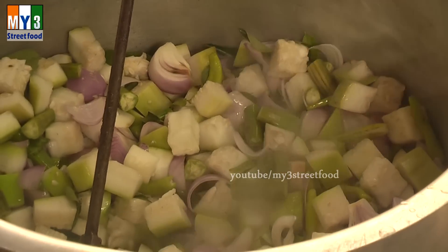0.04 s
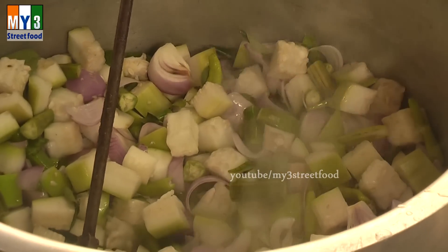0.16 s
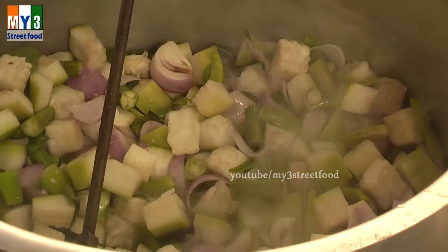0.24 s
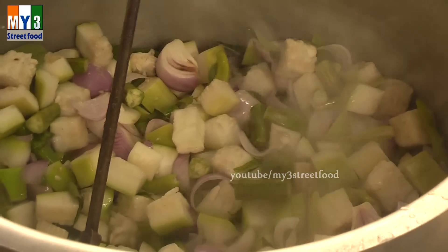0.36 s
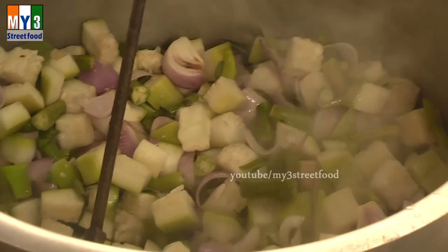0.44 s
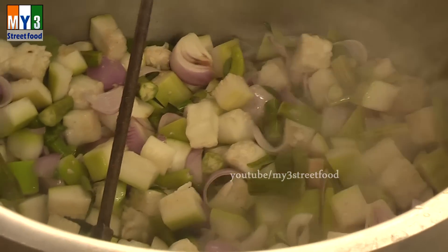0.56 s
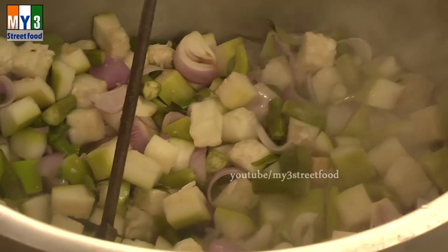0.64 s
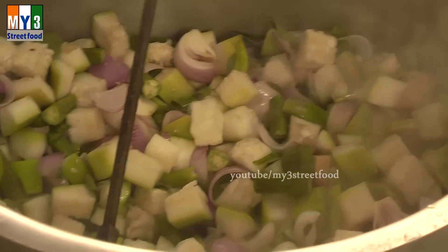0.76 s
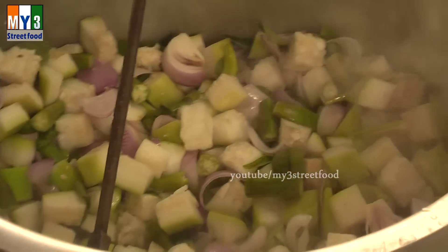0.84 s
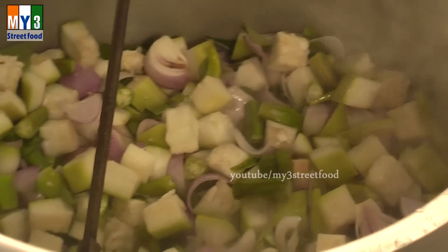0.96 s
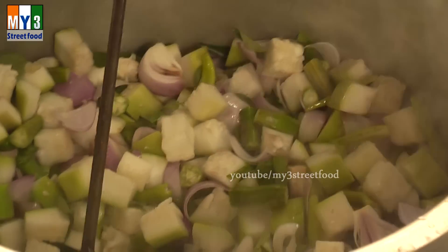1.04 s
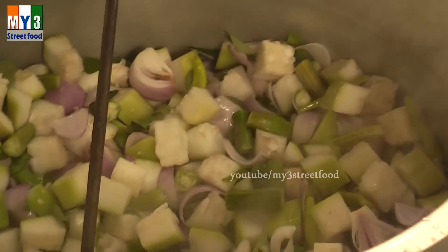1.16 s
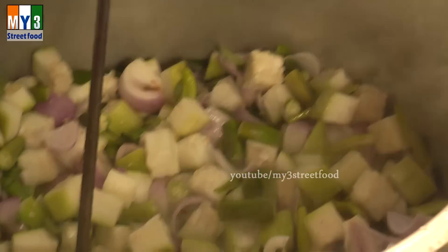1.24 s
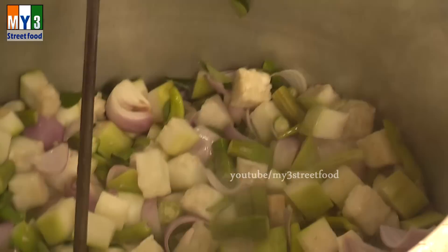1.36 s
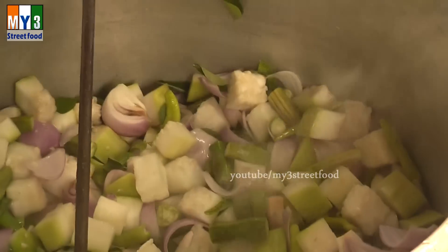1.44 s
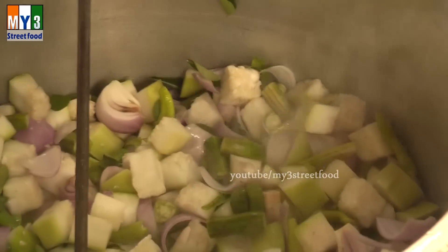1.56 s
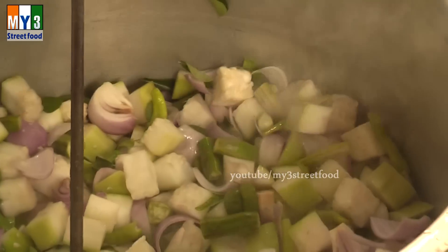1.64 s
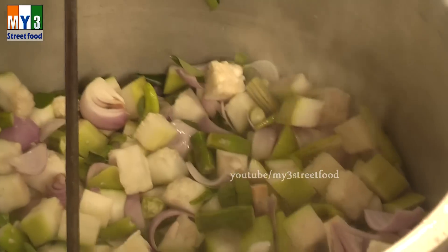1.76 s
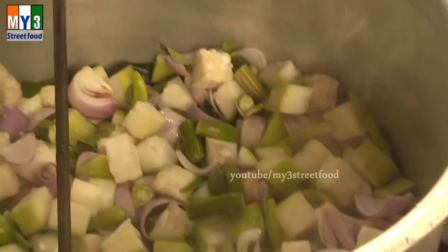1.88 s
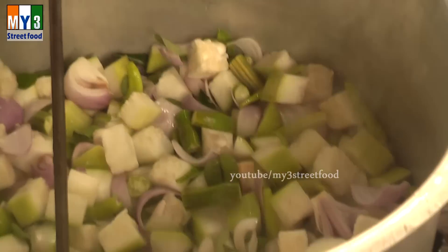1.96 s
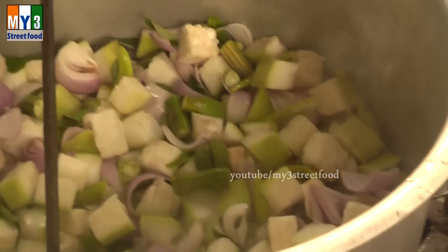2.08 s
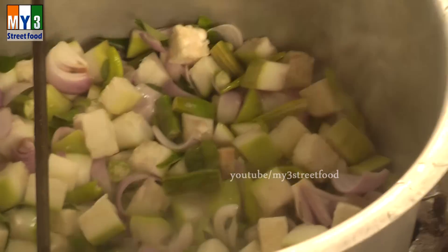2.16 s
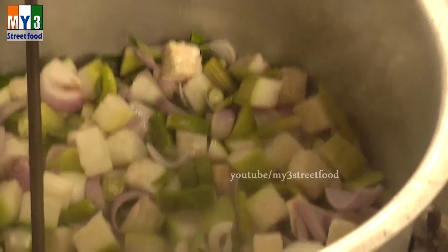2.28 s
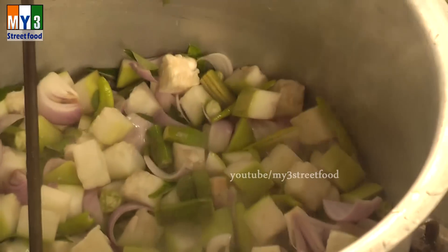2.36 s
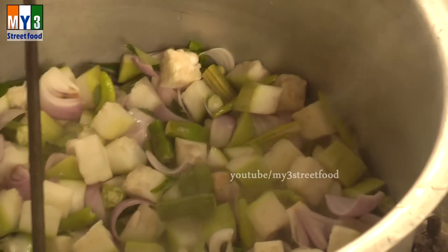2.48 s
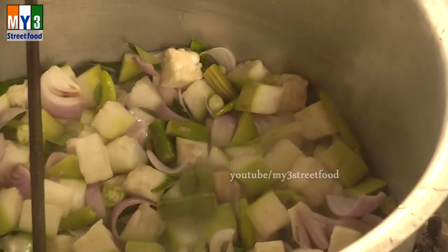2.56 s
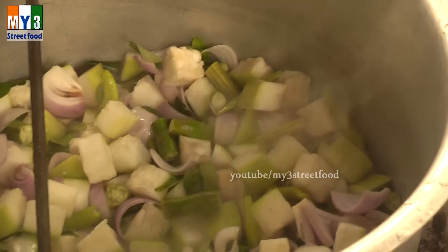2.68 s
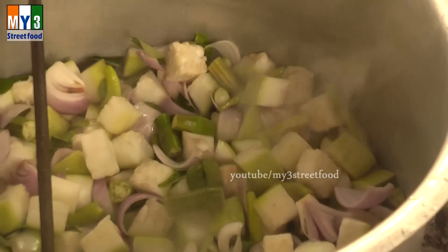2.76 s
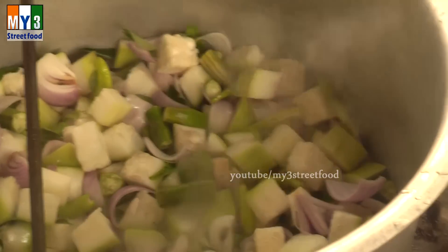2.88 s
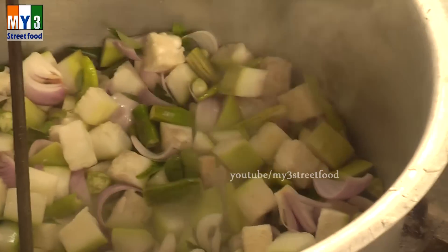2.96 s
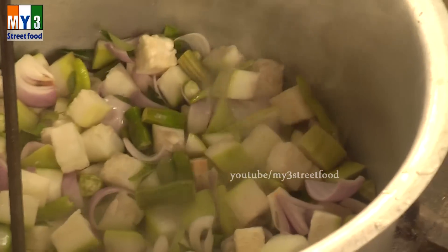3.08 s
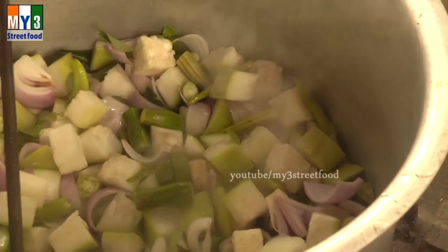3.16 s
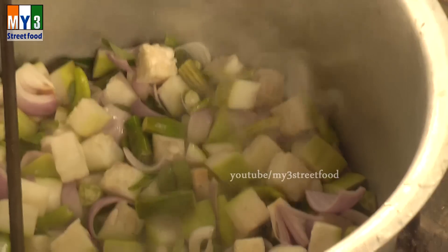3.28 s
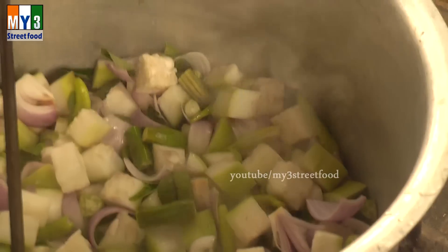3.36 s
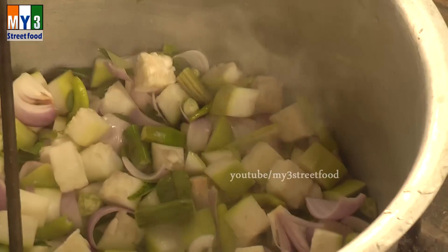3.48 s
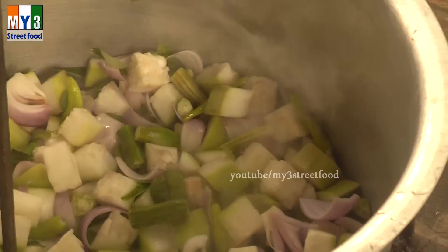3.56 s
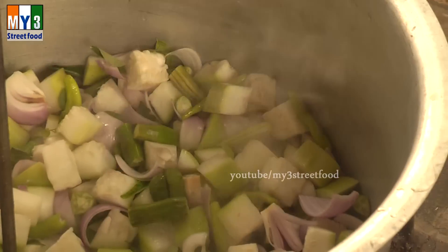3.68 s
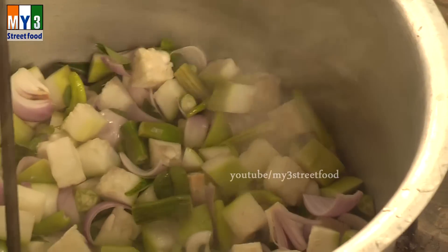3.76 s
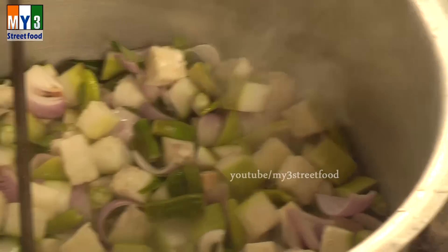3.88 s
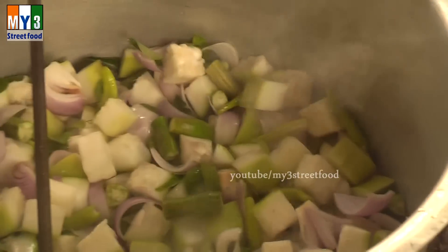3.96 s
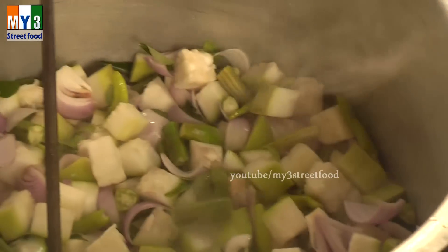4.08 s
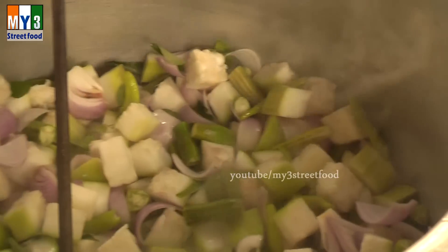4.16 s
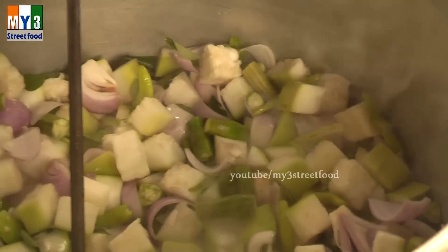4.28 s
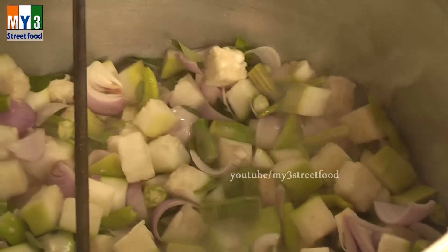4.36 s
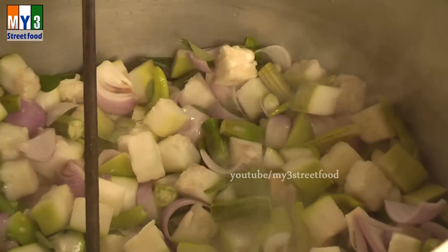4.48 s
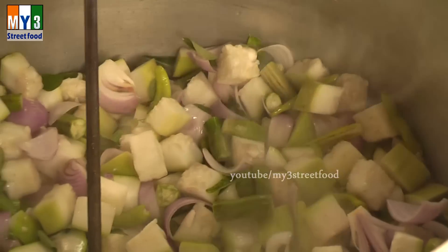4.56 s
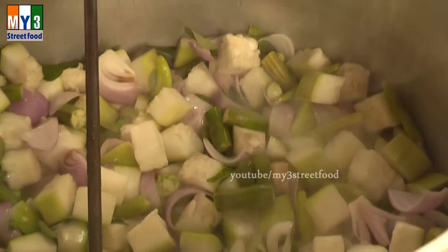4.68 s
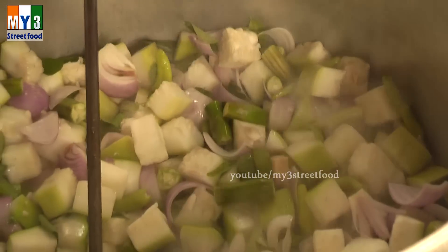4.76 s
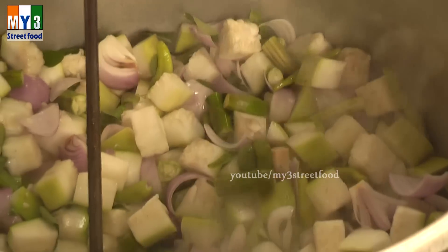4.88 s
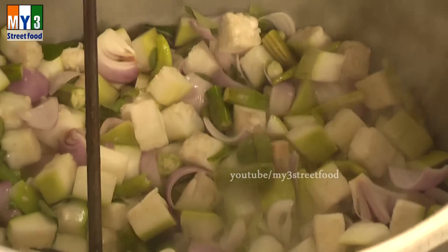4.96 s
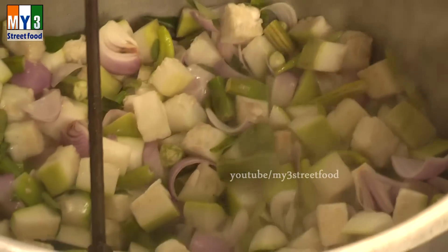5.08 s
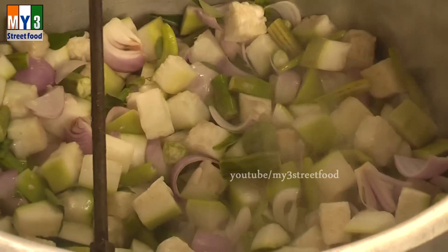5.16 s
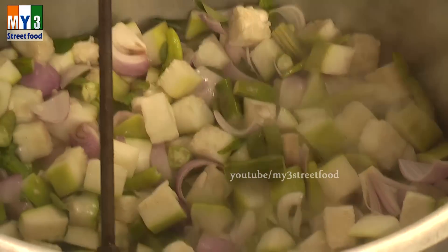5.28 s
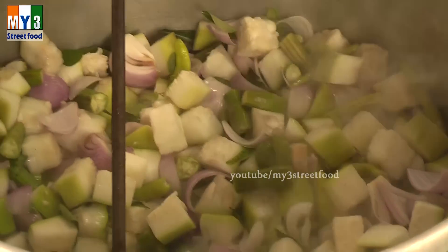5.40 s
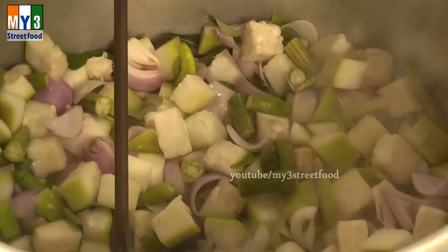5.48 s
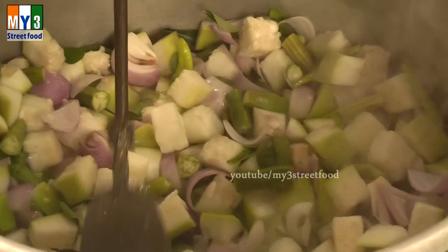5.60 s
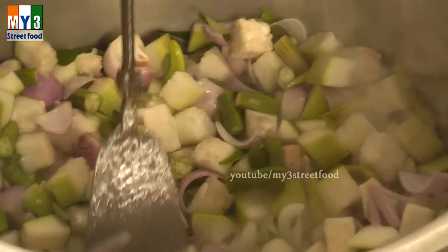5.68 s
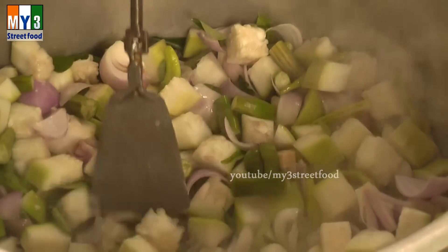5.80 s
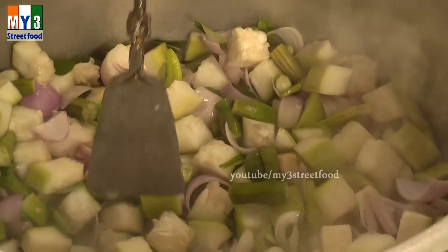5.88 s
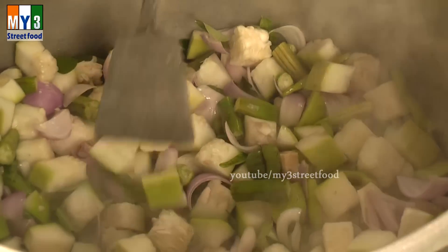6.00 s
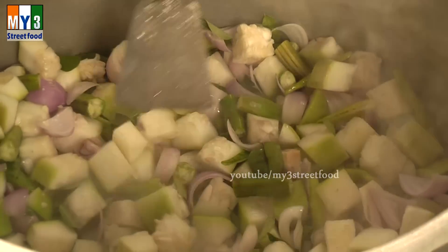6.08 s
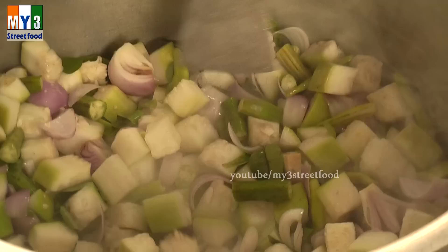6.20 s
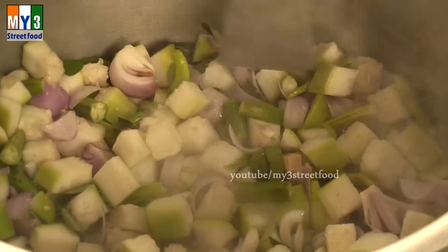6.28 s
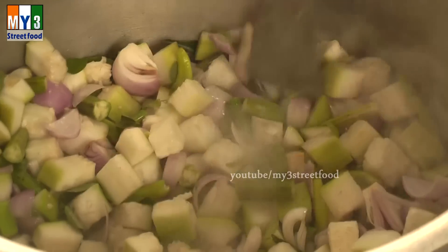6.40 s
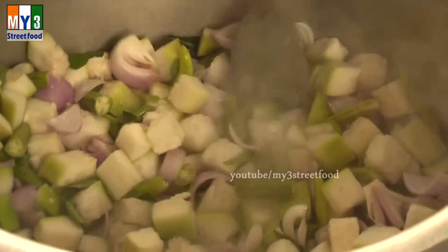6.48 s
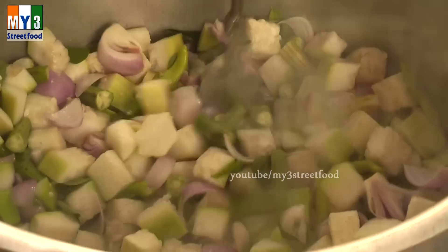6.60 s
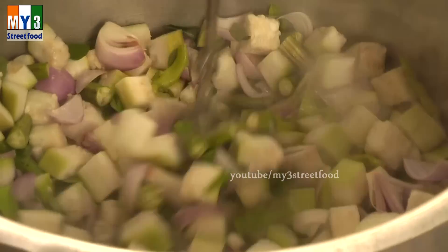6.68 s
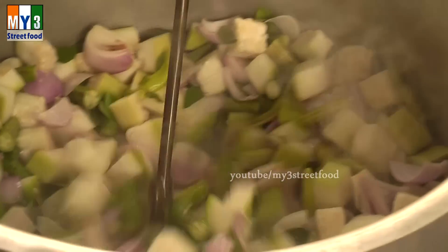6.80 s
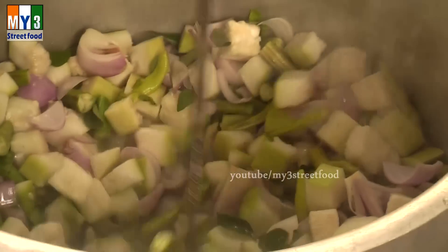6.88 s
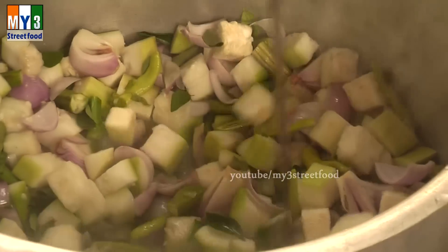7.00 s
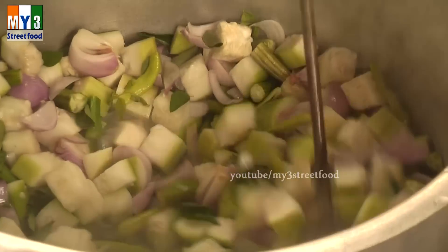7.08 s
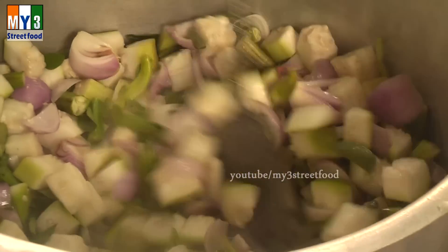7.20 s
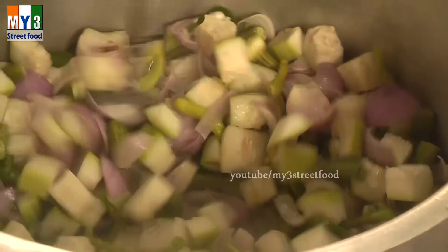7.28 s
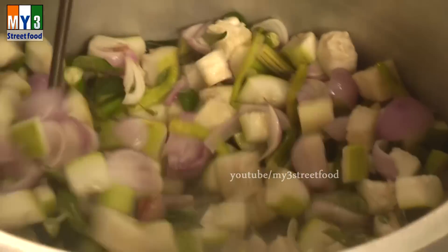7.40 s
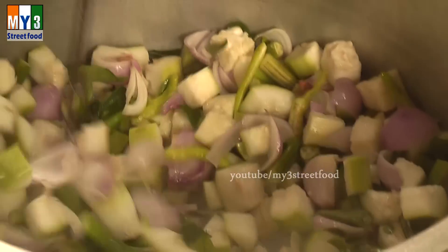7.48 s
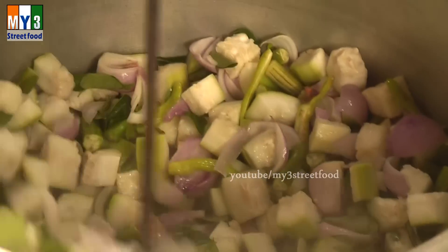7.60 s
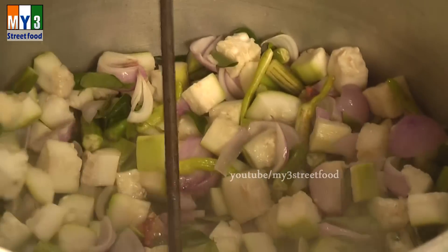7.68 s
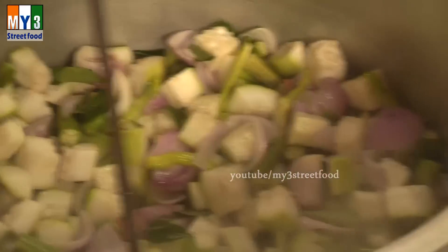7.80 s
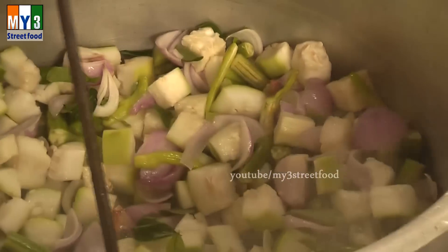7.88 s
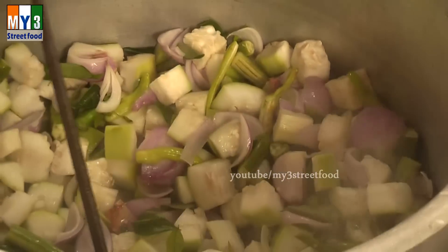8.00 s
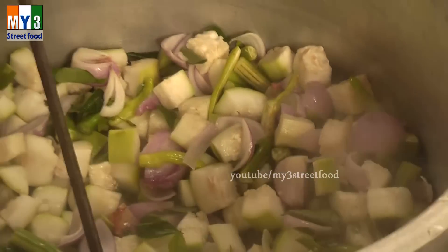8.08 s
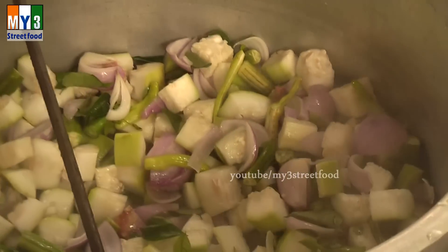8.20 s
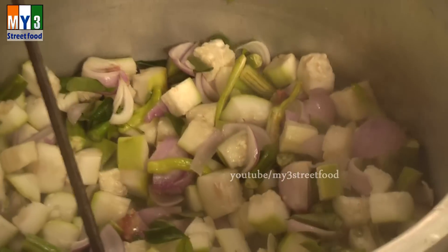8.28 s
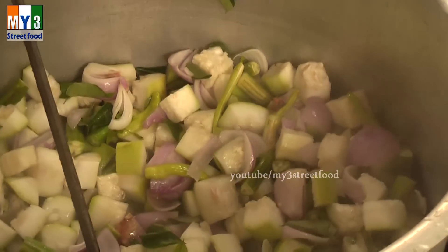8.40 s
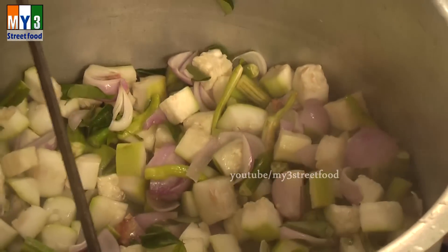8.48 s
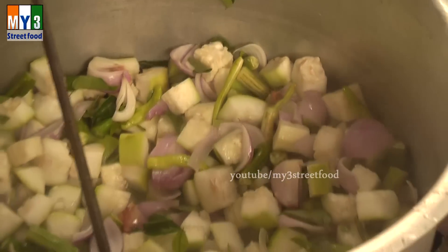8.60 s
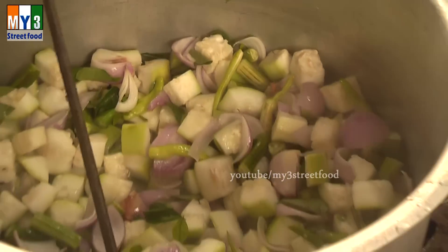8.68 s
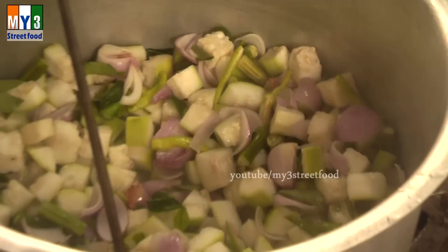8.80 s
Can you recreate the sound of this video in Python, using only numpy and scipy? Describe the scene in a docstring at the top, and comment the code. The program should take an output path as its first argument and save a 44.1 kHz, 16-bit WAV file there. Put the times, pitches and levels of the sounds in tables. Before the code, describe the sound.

Steady wet frying with small spits and soft chirps, broken late by a loud metallic knock, rough scraping strokes and one last ringing clank.

```python
"""Outdoors, chopped vegetables sizzle in a large metal pot: random clicks ring bubbles of many sizes over hiss.
Late on, a long iron stirrer knocks the wall, scrapes along the bottom and turns the pieces over: uneven slips
and short blows excite the resonances of the pot. Dull thuds are pushes into one low resonance each.
A cricket-like chirp, a sagging tone with its octave, repeats nearby, and a struck vessel dies away at first.
One microphone, with a limiter that ducks loud knocks and lets go slowly."""
import sys
import numpy as np
from scipy import signal
from scipy.fft import rfft, irfft
from scipy.io import wavfile
from scipy.ndimage import uniform_filter1d

SR = 44100
rng = np.random.default_rng(int(sys.argv[2]) if len(sys.argv) > 2 else 0)


def log_audio(samples):
    """Write samples as a 16-bit WAV file to the path given in sys.argv[1]."""
    # one column per channel
    frames = np.atleast_2d(samples).T
    # limit to full scale, then quantise
    limited = np.clip(frames, -1, 1)
    pcm = np.round(limited * 32767).astype(np.int16)
    wavfile.write(sys.argv[1], SR, pcm)


N = 390285   # samples

# resonances of the pot, rubbed or struck: centre_hz, nominal_width_hz, relative_level_db
POT_MODES = [(351.5, 31, -9.5), (550, 28, 1), (716, 170, -11.5), (773, 12, -7), (897, 54, -8),
             (1200, 29, -15), (1400, 11, -0.5), (1505, 11, -1), (1680, 410, 1), (1940, 23, -1.5),
             (2145, 52, -14), (2490, 25, -4), (2680, 82, -2), (2900, 110, -1.5), (3430, 190, 1),
             (4000, 170, -3), (4870, 55, -28), (5580, 95, -7), (5900, 140, -6), (6260, 180, -9),
             (6700, 100, -7), (7650, 1500, -7), (10130, 1900, -6)]


def from_db(db):
    """Decibels to gain."""
    return 10 ** (np.asarray(db) / 20)


def rms_one(x):
    """Scale to rms 1."""
    return x / np.sqrt(np.mean(x ** 2) + 1e-30)


def in_time(rows):
    """Columns of a table as curves over every sample."""
    times_s, *columns = np.transpose(rows)
    return [np.interp(np.arange(N) / SR, times_s, column) for column in columns]


def drift(rate_hz):
    """Slow chance: noise twice through a one-pole low-pass, rms 1, made at an eighth of the sample rate."""
    pole = np.exp(-16 * np.pi * rate_hz / SR)
    noise = rng.standard_normal(N // 8 + 8002)
    slow = signal.lfilter([1], [1, -2 * pole, pole * pole], noise)[8000:]   # skip the filter's start
    return np.interp(np.arange(N) / 8, np.arange(len(slow)), rms_one(slow))


def colour(x, spectrum):
    """Causal (minimum-phase) filter with the given spectrum; white noise keeps its rms."""
    hz, db = np.transpose(spectrum)
    grid_hz = np.maximum(np.arange(2049) * SR / 4096, 1)
    cepstrum = irfft(np.log(from_db(np.interp(np.log(grid_hz), np.log(hz), db))))
    cepstrum[1:2048] *= 2   # fold the cepstrum forward in time for minimum phase
    cepstrum[2049:] = 0
    response = irfft(np.exp(rfft(cepstrum)))
    return signal.oaconvolve(x, response / np.sqrt(np.sum(response ** 2)))[:len(x)]


def band_pass(x, low_hz, high_hz):
    """Keep one band, with gentle slopes."""
    return signal.sosfilt(signal.butter(2, [low_hz, high_hz], "band", fs=SR, output="sos"), x)


def ring(x, hz, t60):
    """Two-pole resonance: a unit click sets a sine of starting height 1 ringing, 60 dB down after t60 s."""
    radius, angle = from_db(-60 / (t60 * SR)), 2 * np.pi * hz / SR
    return signal.lfilter([0, np.sin(angle)], [1, -2 * radius * np.cos(angle), radius ** 2], x + 1e-18)


def grains(per_s, spread_db):
    """Random clicks of either sign, a few much larger than the rest; rms 1."""
    sizes = from_db(spread_db * np.minimum(rng.exponential(1, N), 5)) * rng.choice([-1, 1], N)
    return rms_one(sizes * (rng.random(N) < per_s / SR))


def add(out, start_s, sound):
    """Mix a short sound in at start_s."""
    at = round(start_s * SR)
    part = sound[max(-at, 0):N - at]
    out[max(at, 0):max(at, 0) + len(part)] += part


def bursting(spectrum, low_hz, high_hz, per_s, cycles, smooth, patchy_db):
    """Bubbles of sixteen sizes burst, each ringing a few cycles, over a smooth hiss; rms 1."""
    clicks, dealt = grains(per_s, spread_db=1.0), rng.integers(0, 16, N)
    together = drift(30.0)   # flicker shared by all sizes
    bubbles = np.zeros(N)
    for k, hz in enumerate(np.geomspace(low_hz, high_hz, 16)):
        one_size = rms_one(ring(clicks * (dealt == k), hz, cycles / hz)) * np.sqrt(hz)   # equal power per Hz
        bubbles += one_size * from_db(patchy_db * (0.73 * together + drift(23) + 0.63 * drift(2.5)))
    hiss = rng.standard_normal(N)
    mix = np.sqrt(1 - smooth) * rms_one(bubbles) + np.sqrt(smooth) * hiss   # smooth: the hiss's share of power
    return rms_one(colour(mix, spectrum))


def simmer():
    """Bubbling, fizz and spits of the food, and the air in the pot humming along."""
    # the simmer dies down when the food is turned: time_s, bubbling_db, deep_bubbles_db, pot_air_hum_db
    simmer_levels = [(0.0, -39.5, -43, -51.5), (0.6, -40, -43.5, -50), (0.95, -38.5, -42.5, -50.5),
                     (1.2, -39, -44.5, -51), (1.5, -39, -40.5, -51.5), (1.85, -40, -41, -49.5),
                     (3.05, -40, -38.5, -50), (3.25, -39.5, -38, -53.5), (3.6, -40, -38, -50),
                     (5.4, -39.5, -37, -50), (5.75, -40.5, -33, -46), (6.05, -41, -39.5, -48.5),
                     (6.9, -41, -35, -52), (7.04, -51.5, -57, -47.5), (7.25, -49.5, -39.5, -44.5),
                     (7.9, -48.5, -43.5, -44), (7.98, -48.5, -45, -49.5), (8.35, -47.5, -49.5, -49.5),
                     (8.67, -46, -50, -46), (8.85, -44.5, -49, -51)]
    # spectrum of the bubbling: frequency_hz, relative_density_db (per Hz)
    bubbling_spectrum = [(140, -35.5), (210, -17.5), (290, -9.5), (390, -18), (520, -14), (700, -6.5),
                         (900, -6.5), (1150, -7.5), (1300, -1.5), (2200, -0.5), (2380, -5), (3200, -6),
                         (4240, -9), (4750, -10.5), (5200, -10), (5700, -12.5), (6300, -11), (7000, -14.5),
                         (9000, -18), (11700, -37)]
    # spectrum of the fizz: frequency_hz, relative_density_db (per Hz)
    fizz_spectrum = [(6500, -46), (8300, -14.5), (9800, 1.5), (11300, -7.5), (13500, -11), (16000, -11.5)]
    bubbling_db, deep_db, hum_db = in_time(simmer_levels)

    bubbles = bursting(bubbling_spectrum, low_hz=250, high_hz=8200, per_s=4000, cycles=7.4,
                       smooth=0.8, patchy_db=2.76)
    deep = signal.sosfiltfilt(signal.butter(3, 1150, fs=SR, output="sos"), bubbles)
    # the deep part is swapped for itself at its own level
    bubbling = bubbles + (from_db(deep_db - bubbling_db) - 1) * deep
    bubbling += from_db(-13.0) * singing_bubbles()
    out = from_db(bubbling_db) * bubbling

    fizz_db = -49 + 0.25 * (bubbling_db + 40)   # follows a quarter of the bubbling's swing about -40 dB
    out += from_db(fizz_db) * bursting(fizz_spectrum, low_hz=6960, high_hz=16400, per_s=3800, cycles=5.8,
                                       smooth=0.78, patchy_db=5.0)

    unsteady_noise = rng.standard_normal(N) * from_db(0.81 * drift(18))
    hum = ring(unsteady_noise, hz=529, t60=1.78 / 47)
    return out + surges() + small_spits() + from_db(hum_db) * rms_one(hum) + loud_spits()


def singing_bubbles():
    """Lone larger bubbles ring about twenty cycles and rise in pitch as they reach the surface; rms 1."""
    out = np.zeros(N)
    for when, size, strength, rise in rng.random((900, 4)):
        hz = 1320 * 3.2 ** size
        cycles = np.arange(round(40 * SR / hz)) * hz / SR
        shape = np.minimum(cycles / 2, 1) * np.exp(-cycles / 20.0)
        tone = np.sin(2 * np.pi * cycles * (1 + 0.0031 * rise * cycles))
        add(out, when * N / SR, from_db(5.9 * strength - 1.2 * size) * shape * tone)
    return rms_one(out)


def surges():
    """Froth rises for a moment, its bubbles all of a size: swells of clicks in one broad resonance."""
    # swells: middle_s, half_length_s, level_db (rms, at the middle), pitch_hz
    froth_swells = [(1.25, .13, -44, 2060), (2.66, .06, -46.5, 854), (3.24, .1, -44.5, 1880),
                    (5.56, 0.073, -44.5, 1010)]
    t = np.arange(N) / SR
    out = np.zeros(N)
    for middle_s, half_s, level_db, hz in froth_swells:
        froth = rms_one(ring(grains(3000, spread_db=3.5), hz, t60=2.4 / 320))
        out += from_db(level_db) * np.exp(-((t - middle_s) / half_s) ** 2) * froth
    return out


def small_spits():
    """Tiny droplets burst at random, each a brief high tick of its own pitch."""
    per_s, loudest_db, spread_db = 9.6, -36, 13
    lowest_hz, range_octaves, ring_cycles = 5000, 1.1, 15   # cycles until 60 dB down
    out, tap = np.zeros(N), np.eye(1, 300)[0]
    for when, size, pitch in rng.random((round(per_s * N / SR), 3)):
        hz = lowest_hz * 2 ** (range_octaves * pitch)
        tick = ring(tap, hz, ring_cycles / hz)
        add(out, when * N / SR, from_db(loudest_db - spread_db * size) * tick)
    return out


def loud_spits():
    """Loud spits of oil: bursts of noise about a millisecond long, kept to the treble."""
    # spits: start_s, level_db (of the noise, ahead of the band filter)
    oil_spits = [(0.4996, -27), (1.3738, -28), (2.522, -25), (4.4927, -28), (4.603, -26.5), (5.138, -27)]
    out, samples = np.zeros(N), np.arange(60)
    for start_s, level_db in oil_spits:
        add(out, start_s, from_db(level_db) * rng.standard_normal(60) * np.exp(-samples / 37.0))
    return band_pass(out, 5000, 11000)


def ringing():
    """A vessel struck just before the start rings out in dying sines."""
    # its modes: pitch_hz, level_db (rms, at the start), t60_s
    vessel_modes = [(583, -58, 3.9), (610, -46, 3.5), (668, -56, 5.7)]
    t = np.arange(N) / SR
    out = np.zeros(N)
    for hz, level_db, t60 in vessel_modes:
        sine = np.sin(2 * np.pi * (hz * t + rng.random()))
        out += np.sqrt(2) * from_db(level_db - 60 * t / t60) * sine
    return out


def chirps():
    """A slightly wavering, sagging tone with its octave, quick to start and slower to fade."""
    # chirps, some in two notes: start_s, length_s, level_db (rms, ahead of fades and flutter), octave_db (relative)
    chirp_notes = [(-.01, 0.094, -47.5, -14), (.075, .11, -48, -7), (0.697, 0.055, -53, -18),
                   (1.365, 0.07, -49, -18), (1.44, 0.097, -54, -18), (1.98, 0.08, -47.5, -18),
                   (2.072, 0.11, -53, -18), (2.644, 0.09, -49.5, -18), (3.297, 0.055, -51, -18),
                   (3.43, .06, -52, -18), (3.94, 0.17, -52.5, -4), (4.692, 0.07, -52, -18),
                   (5.453, .08, -53, -18), (6.015, 0.14, -48, -9), (8.03, 0.14, -52.5, -12),
                   (8.705, 0.145, -55, -12)]
    pitch_hz, sag_hz_per_s = 4340, 300
    out, waver, flutter = np.zeros(N), drift(31), drift(40)
    for start_s, length_s, level_db, octave_db in chirp_notes:
        t = np.arange(round(length_s * SR)) / SR
        at = max(round(start_s * SR), 0)
        now = slice(at, at + len(t))
        note_hz = pitch_hz * (1 + 0.003 * waver[now]) - sag_hz_per_s * t
        phase = 2 * np.pi * np.cumsum(note_hz) / SR
        fades = np.minimum(1, t / 0.018) * np.minimum(1, (length_s - t) / (0.47 * length_s))
        shape = fades * from_db(level_db + 3.4 * flutter[now])
        tone = np.sin(phase) + from_db(octave_db) * np.sin(2 * phase)
        add(out, start_s, np.sqrt(2) * shape * tone)
    return out


def thuds():
    """Pieces dropping or pots shifted: a soft push of a few milliseconds into one low, short resonance."""
    # thuds: time_s, peak_db, pitch_hz
    dull_thuds = [(2.323, -38, 526), (2.42, -35, 527), (2.606, -29, 470), (2.631, -25, 492),
                  (2.654, -27, 486), (2.73, -33.5, 467), (2.752, -39, 502), (2.82, -39, 500),
                  (5.564, -32.5, 650), (5.599, -36, 598), (5.808, -31.5, 262), (6.611, -20.5, 516),
                  (6.861, -27, 295), (7.053, -22.5, 579), (7.053, -24, 357), (7.082, -20, 527),
                  (7.092, -24, 544), (7.254, -35.5, 558), (7.331, -31, 294), (7.699, -28.5, 655),
                  (7.711, -21.5, 518), (7.535, -32, 752), (7.6, -38, 698), (7.418, -29, 525),
                  (7.562, -26.5, 560), (6.664, -24, 540), (8.18, -30, 557), (8.21, -34.5, 548),
                  (7.753, -25.5, 558), (7.783, -21.5, 528), (8.694, -38, 530), (8.758, -36, 550)]
    push_s = 0.0059
    t = np.arange(SR // 4) / SR
    out = np.zeros(N)
    for time_s, peak_db, hz in dull_thuds:
        swell = np.sin(np.pi * np.minimum(t / push_s, 1)) ** 2
        push = swell * (np.sin(2 * np.pi * hz * t) + 0.62 * rng.standard_normal(len(t)))
        thud = ring(push, hz, t60=0.06 * (hz / 500) ** 1.3)   # lower thuds are deader
        add(out, time_s - push_s / 4, from_db(peak_db) * thud / np.abs(thud).max())
    return out


def scraping():
    """Uneven slips of the blade excite a broad rasp and the resonances of the pot, in three registers."""
    # stirrer shifted or dragged over metal, one list of rows a stroke:
    # time_s, dull_db, middle_db, bright_db, singing_hz (where the blade makes the pot sing), song_db (against middle)
    strokes = [
        [(2.6, -46, -51, -66, 1740, -20), (2.65, -42.5, -53, -67, 1750, -20),
         (2.84, -52.5, -55, -62, 1750, -20)],
        [(5.45, -48.5, -47, -50, 1700, -20), (5.574, -42, -43, -51, 1600, -15),
         (5.76, -64, -53, -51, 1600, -12)],
        [(6.51, -32, -30, -52, 1520, -3), (6.56, -36, -35, -58, 1520, -3), (6.585, -37, -34, -54, 1597, -1),
         (6.61, -34, -35.5, -52, 1600, 4), (6.64, -36, -41, -48, 1520, -3)],
        [(6.66, -30, -39, -40, 1885, -13), (6.7, -30.5, -33.5, -38, 2095, -3),
         (6.742, -31, -28.5, -33, 2050, 2), (6.755, -43, -29, -37, 1995, -6), (6.78, -35, -27, -37.5, 1940, -3),
         (6.805, -44, -25.5, -33, 1925, -13), (6.825, -41.5, -32, -42, 2500, -13),
         (6.85, -32, -32, -35, 3545, -8), (6.875, -37, -29, -34, 3536, -2), (6.905, -26.5, -25, -33, 2996, -13),
         (6.935, -32.5, -22, -30, 3500, -7), (6.955, -38, -33.5, -36, 2300, -5),
         (6.975, -44, -40, -36.5, 1996, -16), (7.0, -46, -47, -51, 2010, -17)],
        [(7.06, -38, -40, -34, 2970, -10), (7.085, -31.5, -38, -41, 2680, 1), (7.102, -35, -47, -41, 2680, -10),
         (7.13, -49, -56, -53, 2680, -14)],
        [(7.141, -51, -43, -44, 2730, -2), (7.155, -46, -44, -39, 2690, 4), (7.179, -49, -37, -33.5, 2710, 2),
         (7.187, -48, -46, -34, 2660, -3), (7.194, -58, -59, -64, 2900, -6), (7.23, -57, -62, -63, 2900, -17)],
        [(7.334, -45, -58, -70, 3460, -15), (7.339, -33, -35, -33, 3400, -17),
         (7.374, -36.5, -42.5, -38.5, 2270, -22), (7.412, -30, -30, -38, 1655, -5),
         (7.44, -28, -28.5, -38, 1680, -3), (7.456, -34, -33.5, -39, 1950, -5),
         (7.49, -36, -36, -33, 2760, -15), (7.515, -29, -31, -26, 3004, -19), (7.542, -32, -27, -32, 1600, -8),
         (7.552, -41, -37, -35, 2900, -8), (7.562, -32, -32, -33, 1913, -8), (7.6, -36, -38, -35, 2360, -12),
         (7.624, -37, -33.5, -40, 2000, -8), (7.65, -35.5, -36, -42, 1710, -3),
         (7.7, -32.5, -37.5, -43.5, 1700, -12), (7.792, -37.5, -46.5, -61, 1540, -9),
         (7.86, -48, -59, -79, 1730, -12)],
    ]
    # spectrum of the rasp: frequency_hz, relative_density_db (per Hz)
    rasp_spectrum = [(71, -40), (120, -21), (204, -4), (426, -9), (533, 6.5), (1230, -13), (1930, -7.5),
                     (3490, -13), (4830, -19.5), (10100, -20.5), (15800, -26)]
    rows = []
    for stroke in strokes:
        first, last = stroke[0], stroke[-1]
        before = (first[0] - .004, -70, -70, -70, *first[4:])
        after = (last[0] + 0.02, -70, -70, -70, *last[4:])
        rows.append([before, *stroke, after])
    *levels_db, singing_hz, song_db = in_time(np.vstack(rows))

    out = np.zeros(N)
    clumps = drift(71)   # slips come in clumps
    for level_db, (low_hz, high_hz) in zip(levels_db, [(100, 1100), (1100, 4500), (4500, 17000)]):
        slips = grains(4000, spread_db=3.0) * from_db(2.3 * clumps + 1.0 * drift(40))
        rasp = band_pass(colour(slips, rasp_spectrum), low_hz, high_hz)
        sway_db = 3.0 if high_hz < 5000 else 2.2   # each resonance comes and goes
        modes = []
        for hz, width_hz, mode_db in POT_MODES:
            if low_hz < hz < high_hz:
                # in the middle register, modes far from the singing pitch are held back
                away_db = 12.0 * np.log2(singing_hz / hz) ** 2 * (low_hz == 1100)
                modes.append((from_db(mode_db - away_db + sway_db * drift(39)), hz, width_hz))
        evened = np.sqrt(uniform_filter1d(sum(gain ** 2 for gain, hz, width_hz in modes), size=4410))
        body = np.zeros(N)
        for gain, hz, width_hz in modes:
            body += ring(gain / evened * slips, hz, 5.1 / width_hz) * np.sqrt(width_hz)
        out += from_db(level_db) * rms_one(rms_one(rasp) + from_db(1.0) * rms_one(body))
    out += from_db(levels_db[1] + song_db + 1.3 * clumps) * song(singing_hz)
    return out + catches()


def song(hz):
    """A narrow, hoarse tone that follows a moving pitch; rms 1."""
    wander = drift(41) + 1j * drift(41)
    return rms_one(np.real(wander * np.exp(2j * np.pi * np.cumsum(hz) / SR)))


def catches():
    """The blade catches and lets go: a short rattle rings the spot under it, with a scratch on top."""
    # catches: time_s, peak_db, centre_hz, scratch_db (against the note)
    blade_catches = [(6.738, -20.5, 2070, 0), (6.779, -15, 1940, -12), (6.816, -18, 2180, 1),
                     (6.832, -14, 1040, 0), (6.857, -17.5, 3550, -11), (6.862, -12.5, 940, -4.5),
                     (6.883, -10, 3600, 5), (6.892, -11, 3430, 5), (6.901, -20, 2200, -3),
                     (6.917, -18, 770, -6), (6.924, -14, 3500, -5), (6.932, -11.5, 3480, 4),
                     (6.944, -14, 3200, 0), (7.074, -31, 2870, -7), (7.085, -20.5, 2740, 3),
                     (7.141, -28.5, 2680, 0), (7.169, -30, 2790, -3), (7.385, -25, 2770, 2),
                     (7.402, -26, 1700, -5), (7.416, -20, 782, -12), (7.433, -19, 1680, -8),
                     (7.441, -23, 1940, -6), (7.462, -26, 980, -3), (7.51, -21, 3200, -1),
                     (7.53, -29, 5870, -11), (7.54, -19, 1400, -8), (7.558, -20, 1710, 2),
                     (7.565, -23, 1880, -3), (7.62, -21.5, 2050, 6), (7.712, -32, 2300, -5)]
    scratch_spectrum = [(200, -15), (1500, -22), (3500, 12), (8000, -2.0), (10000, 6), (16000, -46)]   # Hz, dB
    rise_s = 0.00121
    t = np.arange(round(.06 * SR)) / SR
    out = np.zeros(N)
    for time_s, peak_db, hz, scratch_db in blade_catches:
        length_s = 0.0017 * 2 ** (-peak_db * 0.16)   # harder catches let go sooner
        shape = np.exp(-(t / length_s) ** 1.3) * (1 - np.exp(-t / rise_s))
        rattle = rng.standard_normal(len(t)) * shape
        note = ring(rattle, hz, t60=20.0 / hz)
        scratch = colour(rattle, scratch_spectrum)
        both = rms_one(note) + from_db(scratch_db) * rms_one(scratch)
        add(out, time_s - rise_s, from_db(peak_db) * both / np.abs(both).max())
    return out


def knocks():
    """Stirrer against the wall: a short crack, then resonances near its centre rattle, the high ones dying first."""
    # blows: time_s, crack_peak_db, crack_body_hz, crack_body_t60_s,
    # ring_db, ring_centre_hz, narrowing_db (per octave squared), ring_t60_s (up to 1500 Hz)
    wall_knocks = [(6.4952, 1.5, 2100, 0.013, -24, 1850, 15, 0.4),
                   (6.6446, -1, 640, 0.013, -19, 566, 12, 0.031),
                   (7.053, -12.5, 447, 0.016, -41, 1510, 43, 0.21),
                   (7.337, -28, 3500, .008, -42, 3610, 17, 0.083),
                   (8.1748, -11, 2530, 0.044, -32, 1920, 2.5, 0.98)]
    # spectrum of the crack: frequency_hz, relative_density_db (per Hz)
    crack_spectrum = [(150, -44), (380, -2.5), (2080, -3), (3940, -2), (5470, -9), (9640, -2.5),
                      (12500, -14.5), (15800, -16)]
    out, t = np.zeros(N), np.arange(SR // 2) / SR
    for time_s, crack_db, body_hz, body_t60, ring_db, centre_hz, narrow_db, t60 in wall_knocks:
        burst = (t == 0) + 0.24 * rng.standard_normal(len(t)) * np.exp(-t / 0.0018)
        crack = colour(burst, crack_spectrum)
        crack = rms_one(crack) + from_db(2) * rms_one(ring(crack, body_hz, body_t60))
        add(out, time_s, from_db(crack_db) * crack / np.abs(crack).max())

        dying_noise = rng.standard_normal(len(t)) * from_db(-60 * t / t60)
        wash = ring(dying_noise, centre_hz, 1.8 / centre_hz)   # dense modes of the wall blur
        add(out, time_s, from_db(ring_db - 15.0) * wash)

        for hz, width_hz, mode_db in POT_MODES:
            mode_t60 = t60 * min(1, 1500 / hz) ** 0.94
            dying = from_db(-60 * t / mode_t60) + 7.1 * np.exp(-t / 0.0048)   # a strong first moment
            away_db = narrow_db * np.log2(hz / centre_hz) ** 2
            gain = from_db(ring_db + mode_db - away_db) * np.sqrt(width_hz / SR)
            rattle = rng.standard_normal(len(t)) * dying
            add(out, time_s, gain * ring(rattle, hz, 2.2 / max(width_hz, 120.0)))
    return out


def blade():
    """Struck iron rings in dying modes that flutter while it rattles loose against the pot."""
    # clear modes of the iron stirrer: pitch_hz, t60_s
    iron_modes = [(720, 0.27), (780, 0.19), (1378, 0.3), (1453, 0.43), (1530, 0.28), (1701, 0.25),
                  (2024, 0.33), (2220, 0.4), (2380, 0.36), (2500, 0.13), (2850, .2), (3500, .08)]
    # knocks that set it ringing, each at another spot: time_s, list of peak_db (one a mode, ahead of the flutter)
    iron_blows = [(6.498, [-57, -35, -55, -34, -23, -38, -39, -28, -42, -50, -46, -47]),
                  (7.054, [-55, -43, -58, -37, -33, -55, -60, -55, -48, -55, -45, -55]),
                  (8.175, [-36, -41, -38, -34, -55, -26, -47, -48, -36, -26, -44, -26]),
                  (8.212, [-43, -52, -48, -40, -60, -52, -37, -55, -46, -48, -45, -55])]
    out = np.zeros(N)
    for k, (hz, t60) in enumerate(iron_modes):
        taps = np.zeros(N)
        for time_s, peaks_db in iron_blows:
            taps[round(time_s * SR)] = from_db(peaks_db[k]) * rng.choice([-1, 1])
        out += ring(taps, hz, t60) * (1 + 0.6 * drift(71))
    return out


def scene():
    """All sources reach one microphone, written to both channels."""
    mix = simmer() + ringing() + chirps() + thuds() + scraping() + knocks() + blade()
    return np.tile(mix, (2, 1))


def record(dry):
    """The bass is cut; a limiter lags a little and lets go slowly, peaks are rounded, the top is cut."""
    threshold_db, release_db_per_s, lag_s, ceiling = -23.5, 101, 0.0015, .34
    x = signal.sosfilt(signal.butter(6, 180, "high", fs=SR, output="sos"), dry[0])
    level_db = 10 * np.log10(uniform_filter1d(x ** 2, size=88) + 1e-12)   # over two milliseconds
    fall_db = release_db_per_s * np.arange(N) / SR
    held_db = np.maximum.accumulate(level_db + fall_db) - fall_db   # jumps up, falls at the release rate
    over_db = np.maximum(held_db - threshold_db, 0)
    lag = np.exp(-1 / (lag_s * SR))
    cut_db = .8 * signal.lfilter([1 - lag], [1, -lag], over_db)
    x = ceiling * np.tanh(x * from_db(-cut_db) / ceiling)
    top_cut = signal.ellip(12, .5, 60, 15800, fs=SR, output="sos")
    return np.tile(signal.sosfilt(top_cut, x), (2, 1))


dry = scene()
out = record(dry)
log_audio(out)
```